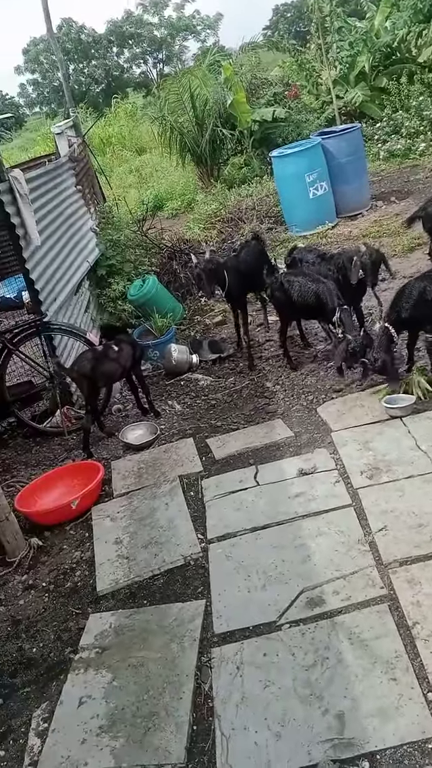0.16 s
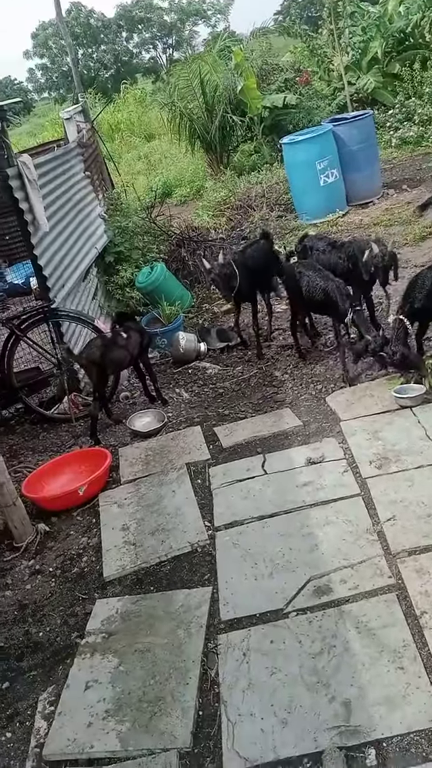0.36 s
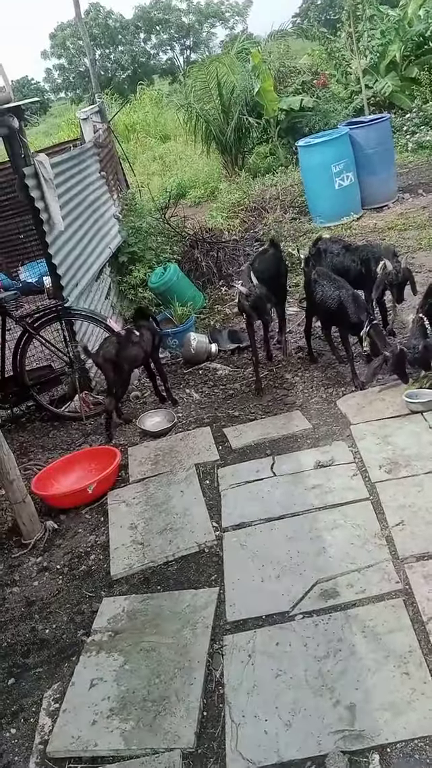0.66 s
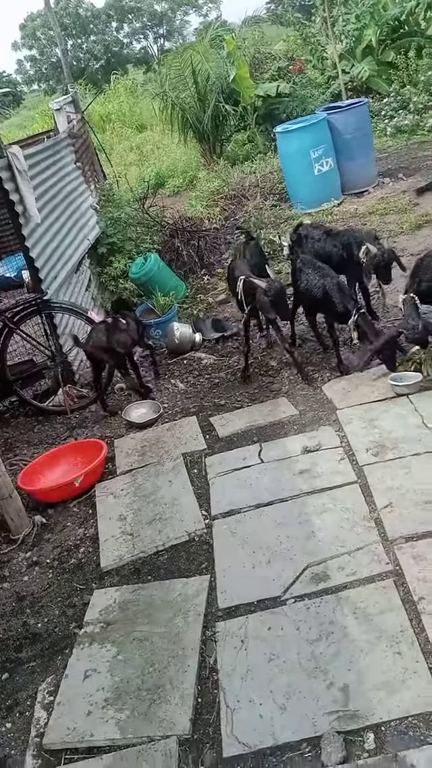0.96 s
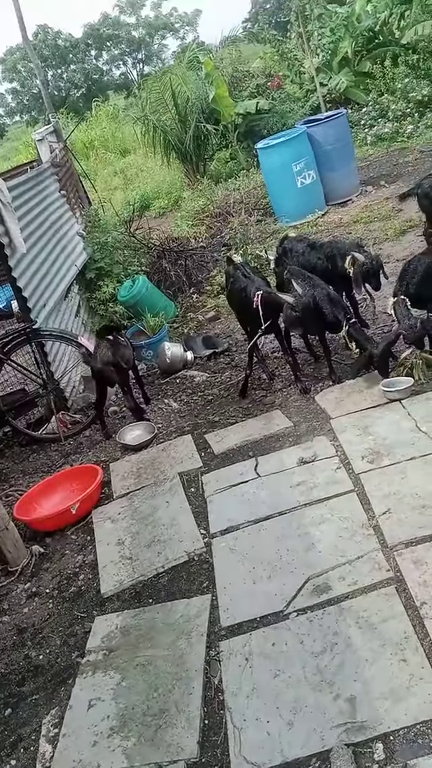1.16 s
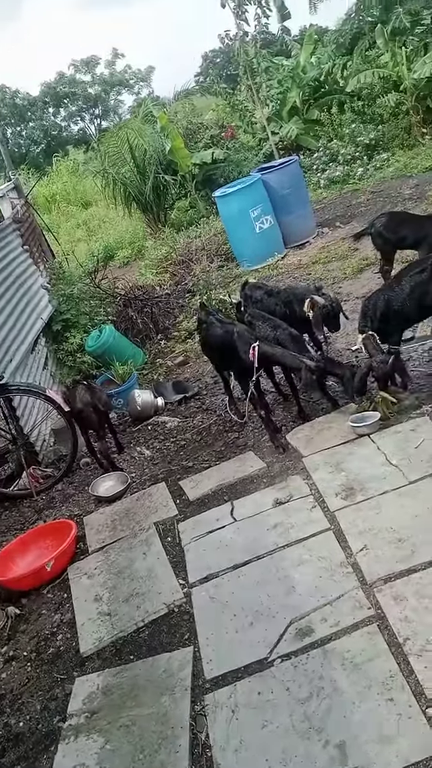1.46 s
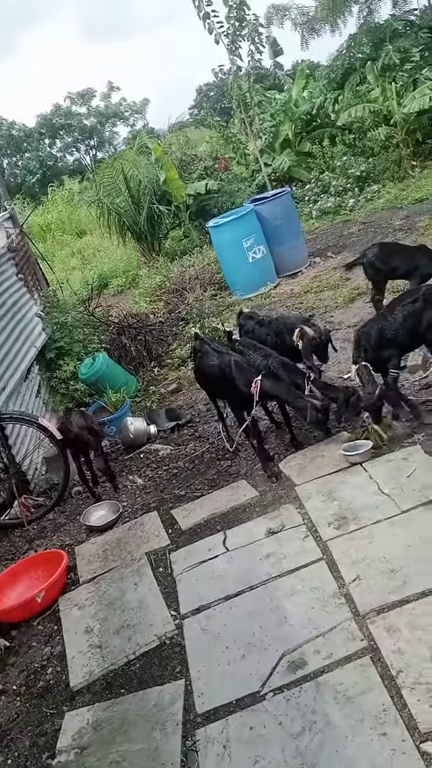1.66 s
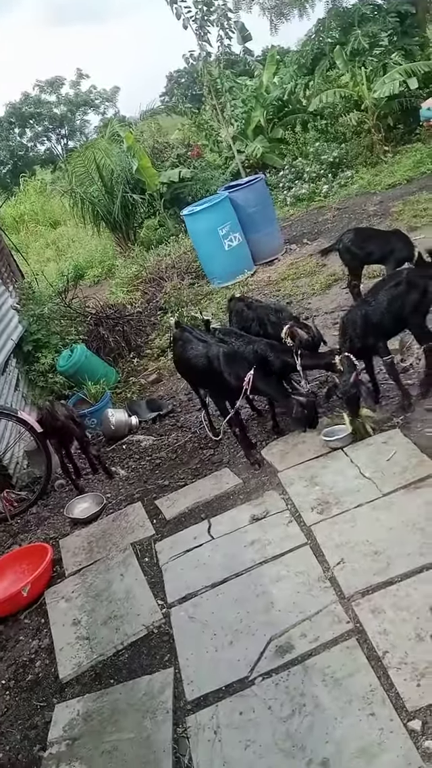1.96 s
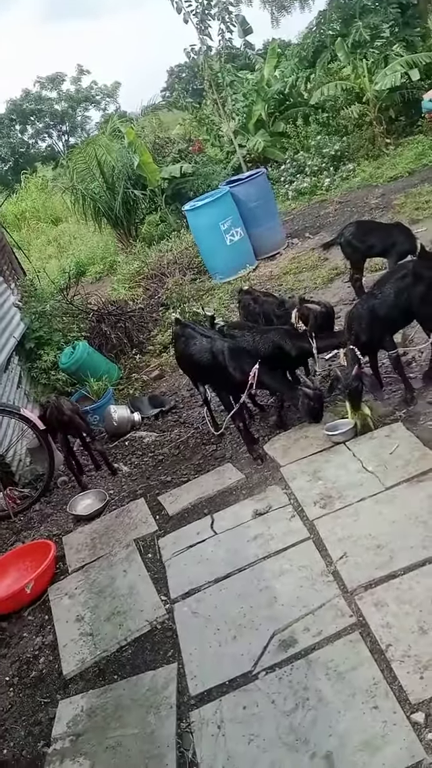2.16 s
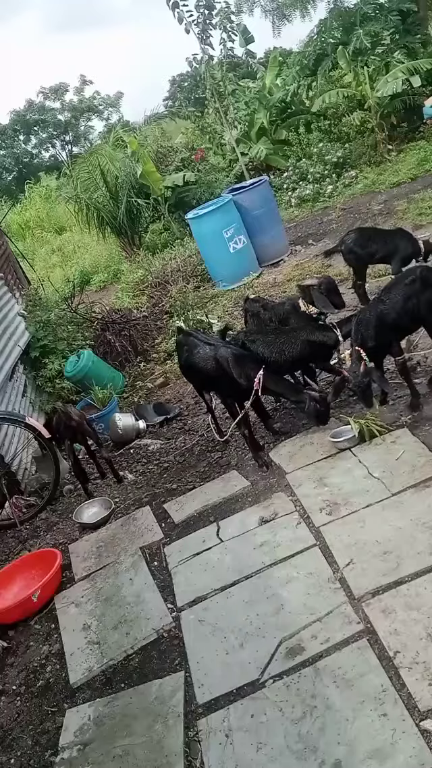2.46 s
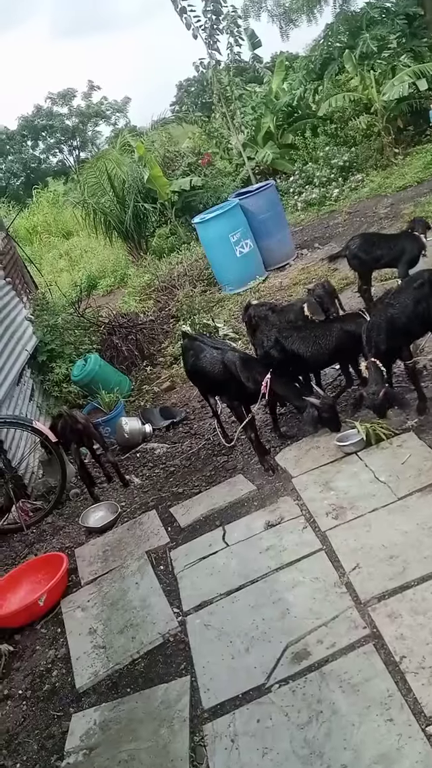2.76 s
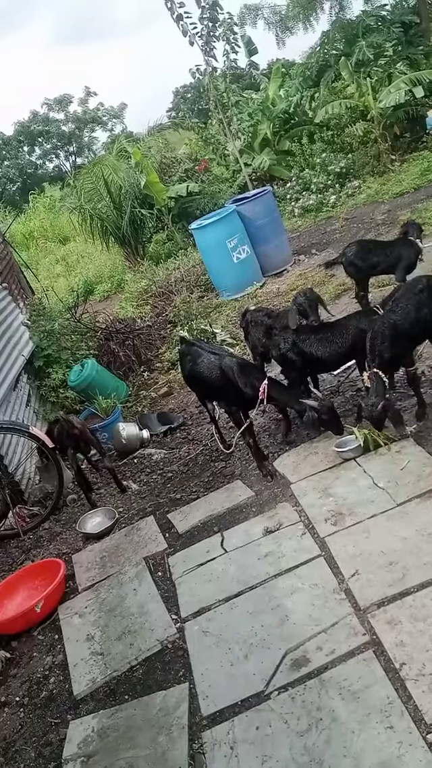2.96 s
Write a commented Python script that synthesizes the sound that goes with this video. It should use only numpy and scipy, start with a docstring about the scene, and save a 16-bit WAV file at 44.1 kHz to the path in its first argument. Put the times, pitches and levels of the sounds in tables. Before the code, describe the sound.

One loud clear goat bleat opens, roughening as it stops, then much quieter feeding around the microphone: crackling fodder, sharp snaps, light metallic clinks, thin bird whistles and a hoarse distant animal call outdoors.

```python
"""A farmyard with walls close by: a goat kid gives one high, clear bleat that breaks into a rasp and echoes.
Around one microphone the herd feeds: leaves rustle, stalks snap and a small metal piece clinks.
A bird whistles, an animal calls far off, and a low rumble swells and sinks throughout.
The voices are built from sines, the metal from ringing modes, the fodder and still air from shaped noise."""
import sys
import numpy as np
from scipy import signal
from scipy.fft import rfft, irfft
from scipy.io import wavfile
from scipy.ndimage import uniform_filter1d

SR = 44100
rng = np.random.default_rng(int(sys.argv[2]) if len(sys.argv) > 2 else 0)


def inscribe(sig):
    """Save sig as 16-bit PCM at rate SR to the path in sys.argv[1].

    A 1-D sig is mono; a 2-D sig holds one channel per row.
    Samples are clipped to [-1, 1] before scaling.
    """
    pcm = np.round(np.clip(np.atleast_2d(sig).T, -1, 1) * 32767)
    wavfile.write(sys.argv[1], SR, pcm.astype(np.int16))


N = 136710  # samples, 3.1 s


def undb(db):
    """Decibels to gain."""
    return 10 ** (np.asarray(db) / 20)


def unit(x):
    """Scale to rms 1."""
    return x / np.sqrt(np.mean(x ** 2) + 1e-20)


def curve(rows, lead=0):
    """Each column of a timed table, joined by straight lines; time starts at -lead seconds."""
    rows = np.array(rows, float)
    t = np.arange(N) / SR - lead
    return [np.interp(t, rows[:, 0], column) for column in rows.T[1:]]


def response(hz, points):
    """Gain of a (frequency, level) shape, read on a logarithmic frequency axis."""
    f, db = np.array(points, float).T
    return undb(np.interp(np.log(hz + 1), np.log(f), db))


def colour(x, points):
    """Causal minimum-phase filter with a (frequency, level) shape."""
    size = 8192
    cepstrum = irfft(np.log(response(np.arange(size // 2 + 1) * SR / size, points)))
    # fold the cepstrum forward in time, so that nothing sounds before its cause
    cepstrum[1:size // 2] *= 2
    cepstrum[size // 2 + 1:] = 0
    impulse = irfft(np.exp(rfft(cepstrum)))
    return signal.fftconvolve(x, impulse)[:len(x)]


def noise(points):
    """Coloured noise, rms 1."""
    return unit(colour(rng.standard_normal(N), points))


def walk(rate):
    """Smooth chance with spread 1, newly drawn `rate` times a second."""
    k = max(int(SR / rate), 1)
    steps = np.repeat(rng.standard_normal(N)[:N // k + 1], k)
    return unit(uniform_filter1d(steps, k)[:N])


def fade(start, t60):
    """Sudden onset and exponential decay by 60 dB in t60 seconds."""
    age = np.arange(N) / SR - start
    return (age >= 0) * np.exp(-np.log(1000) * np.maximum(age, 0) / t60)


def turn(hz):
    """Phase of a moving pitch."""
    return 2 * np.pi * np.cumsum(hz) / SR


def note(start, length):
    """Progress 0-1 through a note, and its rounded swell."""
    u = np.clip((np.arange(N) / SR - start) / length, 0, 1)
    return u, np.sqrt(4 * u * (1 - u))


# Colour of the diffuse echo: (frequency [Hz], level [dB])
ECHO_COLOUR = [(500, -1.5), (1200, -6), (3000, -0.5), (6500, -12.5)]
ECHO_T60_S, ECHO_DELAY_S = 0.38, .015


def tail(x, wet_db):
    """Diffuse echo from sheds and bushes: decaying noise, scaled to unit energy, smears the sound."""
    ring = noise(ECHO_COLOUR) * fade(ECHO_DELAY_S, ECHO_T60_S)
    return undb(wet_db) * signal.fftconvolve(x, ring / np.sqrt(np.sum(ring ** 2)))[:N]


# Single echoes from the nearby walls: (delay [s], level [dB])
NEARBY_WALLS = [(.0125, -4.5), (.0217, -14.5), (.058, -11)]


def yard(x):
    """Direct sound, then separate wall echoes and the diffuse tail."""
    out = x + tail(x, wet_db=-8.5)
    for delay, db in NEARBY_WALLS:
        out = out + undb(db) * np.pad(x, (int(delay * SR), 0))[:N]
    return out


# Pitch of the bleat: (time [s], pitch [Hz])
BLEAT_PITCH = [(0, 513), (.06, 526), (.082, 509), (.15, 531), (.176, 521), (.25, 518), (.32, 507),
               (.39, 480)]
# Effort of the bleat, levels relative to each other:
# (time [s], level of the low partials [dB], level of the treble [dB], roughness [0-1])
BLEAT_EFFORT = [(0, -42.5, -29.5, 0.26), (.05, -40.5, -38.5, 0.36), (.085, -38.5, -31.5, 0.39),
                (.22, -37.5, -31, 0.06), (.325, -41, -29.5, 0), (.372, -43, -37, .9),
                (.392, -46.5, -45.5, .9), (.46, -110, -100, 0.7)]
# Resonances of throat and mouth: (frequency [Hz], level [dB])
THROAT_SHAPE = [(510, -27.5), (1040, -13), (1560, 0), (2080, -15.5), (3120, -15), (3620, -2.5), (4150, -13),
                (4700, -7), (5750, -2), (6250, 3.5), (6750, 1), (7250, -10.5), (14000, -50.5)]
TREBLE_HZ = 3780  # partials that start above this follow the treble level
JITTER, RASP_JITTER = 0.00304, .07  # fractions of the pitch
SHIMMER_DB = 4  # independent wavering of each partial
FLUTTER_DB, FLUTTER_RATE = 1.9, 330  # shared flicker of the treble [dB, per s]
AIR_DB, RASP_DB, CHEST_DB = 4, -2.5, -24  # against the treble, before roughness weights them
# A bright mouth resonance climbs through the bleat
MOUTH_FROM_HZ, MOUTH_RISE_HZ_PER_S, MOUTH_WIDTH_HZ, MOUTH_DB = 4920, 4780, 560, 4
LEAD_S = .15  # the voice runs this long before time 0, so its echoes already sound


def smooth_walk(rate):
    """A chance walk rounded further, for slow changes in the voice."""
    return unit(uniform_filter1d(walk(rate), size=300))


def goat():
    """The bleat is already under way: folds drive the throat, air hisses with them; as effort ends they rasp."""
    pitch, = curve(BLEAT_PITCH, LEAD_S)
    low_db, high_db, rough = curve(BLEAT_EFFORT, LEAD_S)
    since_start = np.clip(np.arange(N) / SR - LEAD_S, 0, BLEAT_PITCH[-1][0])
    mouth_hz = MOUTH_FROM_HZ + MOUTH_RISE_HZ_PER_S * since_start

    wobble = JITTER * smooth_walk(109.65) + RASP_JITTER * rough ** 2 * np.abs(rough) * walk(600)
    phase = turn(pitch * (1 + wobble))
    flutter = undb(FLUTTER_DB * walk(FLUTTER_RATE))
    low, high = np.zeros(N), np.zeros(N)
    for k in range(1, 27):
        mouth = MOUTH_DB * np.exp(-((k * pitch - mouth_hz) / MOUTH_WIDTH_HZ) ** 2)
        gain = response(k * pitch, THROAT_SHAPE) * undb(SHIMMER_DB * smooth_walk(79.74) + mouth)
        partial = gain * np.cos(k * phase + rng.uniform(0, 2 * np.pi))
        if k * BLEAT_PITCH[0][1] < TREBLE_HZ:
            low += partial
        else:
            high += partial * flutter

    # breath is let through once per cycle of the folds
    puffs = noise(THROAT_SHAPE) * (1 + np.cos(phase))
    above = signal.butter(8, TREBLE_HZ, "high", fs=SR, output="sos")
    air = unit(signal.sosfilt(above, puffs))
    chest_band = signal.butter(2, [300, 520], "band", fs=SR, output="sos")
    chest = unit(signal.sosfilt(chest_band, rng.standard_normal(N)))
    rasp = undb(RASP_DB) * np.clip(2 * rough - 1, 0, 1) * noise(THROAT_SHAPE)
    rasp = rasp + undb(CHEST_DB) * rough ** 2 * chest

    treble = (unit(high) + undb(AIR_DB) * rough * air + rasp) / np.sqrt(1 + rough ** 2)
    voice = undb(low_db) * unit(low) + undb(high_db) * treble
    lead = int(LEAD_S * SR)
    voice = voice * np.minimum(np.arange(N) / lead, 1)
    return np.pad(yard(voice * undb(-1.5))[lead:], (0, lead))


# Leaves stirred by the feeding herd, levels relative: (time [s], level [dB])
LEAF_LEVEL = [(.55, -69.5), (.77, -67), (.865, -72.5), (.92, -66.5), (1.06, -72), (1.12, -66), (1.28, -68),
              (1.43, -77.5), (1.64, -66), (1.72, -70), (1.88, -64), (1.955, -56), (2.05, -67), (2.14, -64),
              (2.35, -64.5), (2.48, -71.5), (2.53, -64), (2.77, -73.5), (2.94, -65.5), (3.06, -74.5)]
# Colour of the leaves: (frequency [Hz], level [dB])
LEAF_COLOUR = [(300, -13.5), (2700, -12.5), (3600, -4), (6500, 3), (7600, -2.5), (9500, -18),
               (14000, -29.5)]
RUSTLE_DB = 1  # raises the whole rustle
GRAIN_RATE, GRAIN_SPREAD_DB = 4300, 4  # crackles per second, and their uneven strength
LEAF_T60_S = 0.019
LEAF_PATCH_DB, LEAF_PATCH_RATE, LEAF_BAND_HZ = 2.3, 24, 1100


def patchy(x):
    """Each band swells and sinks on its own, as different leaves are moved."""
    spectrum = rfft(x)
    band = np.arange(N // 2 + 1) * SR / N / LEAF_BAND_HZ
    out = np.zeros(N)
    for k in range(16):
        one_band = irfft(spectrum * np.maximum(1 - np.abs(band - k), 0), N)
        out += one_band * undb(LEAF_PATCH_DB * walk(LEAF_PATCH_RATE))
    return unit(out)


def rustle():
    """Handfuls of leaves brush and crackle unevenly: random short grains set the strength of noise."""
    strength = undb(GRAIN_SPREAD_DB * np.minimum(rng.exponential(size=N), 5))
    grains = (rng.random(N) < GRAIN_RATE / SR) * strength
    power = signal.fftconvolve(grains ** 2, fade(0, LEAF_T60_S) ** 2)[:N]
    brushing = np.sqrt(np.abs(power))
    leaves = unit(colour(brushing * rng.standard_normal(N), LEAF_COLOUR))
    return patchy(leaves) * undb(curve(LEAF_LEVEL)[0] + RUSTLE_DB)


# Snapping stalks and hoof ticks:
# (time [s], level [dB], level of the woody body against the crack [dB], decay by 60 dB [s])
STALK_SNAPS = [(0.7382, -69.5, -5, 0.048), (0.882, -59.5, -23, 0.078), (0.9863, -62.5, -3.5, 0.054),
               (1.102, -56.5, -5, 0.045), (1.464, -52, -27, 0.014), (1.614, -52.5, -13.5, 0.07),
               (1.66, -64.5, 2.5, 0.078), (1.76, -68, 8, 0.058), (1.781, -60.5, 0, 0.14),
               (1.819, -60.5, 3, 0.021), (2.5678, -46, -13, 0.029)]
# Colour of the crack: (frequency [Hz], level [dB])
CRACK_COLOUR = [(1500, -38), (4000, -18.5), (6800, 6), (13000, -33.5)]
# Colour of the woody body: (frequency [Hz], level [dB])
BODY_COLOUR = [(900, -4.5), (2700, 12), (6000, -12)]


def snaps():
    """Stalks snap and hooves tick: short noise bursts, a bright crack over a woody body."""
    out = np.zeros(N)
    crack, body = noise(CRACK_COLOUR), noise(BODY_COLOUR)
    for start, db, body_db, t60 in STALK_SNAPS:
        burst = uniform_filter1d(fade(start, t60), size=60)  # softens the onset
        out += undb(db) * burst * (crack + undb(body_db) * body)
    return out


def feeding():
    """Rustle and snaps share one faint diffuse echo."""
    out = rustle() + snaps()
    return out + tail(out, wet_db=-12)


# Knocks on the metal: (time [s], level [dB], hardness, as level of the contact tick [dB])
METAL_KNOCKS = [(2.0807, -56, -19), (2.1401, -41.5, -24), (2.1536, -46.5, -22), (2.226, -51, -13),
                (2.2358, -58, -25), (2.2785, -54.5, -16), (2.608, -46.5, -36), (2.691, -51.5, -35),
                (2.805, -52.5, -4.5), (2.822, -57, -29), (2.9615, -52.5, 11.5)]
# Modes of the metal: (frequency [Hz], level [dB], decay by 60 dB at hardness 0 dB [s])
METAL_MODES = [(2160, -17, 0.12), (2973, -5, 0.29), (3010, -2.5, 0.3), (3076, -0.5, 0.24),
               (3310, -12, 0.12), (7500, -18, 0.23), (10600, -27, 0.13)]
# Colour of the contact tick: (frequency [Hz], level [dB])
TICK_COLOUR = [(1200, -32), (3100, 4), (4300, -15), (7500, -3), (11000, -27)]
TICK_T60_S, METAL_DETUNE = .03, .004  # detune: spread as a fraction of each mode
METAL_SWING, METAL_SWING_RATE = .007, 130  # pitch wander [fraction, per s]
# A hard knock leaves the piece free to ring longer (dB of ring time per dB of hardness)
RING_BUILD_S, RING_PER_HARDNESS = 0.0041, 0.33


def clinks():
    """A small swinging metal piece is knocked: a tick, then modes that beat, bend and shiver."""
    t, out = np.arange(N) / SR, np.zeros(N)
    tick = noise(TICK_COLOUR)
    shiver = undb(2 * walk(250))
    swing = turn(1 + METAL_SWING * walk(METAL_SWING_RATE))  # phase of a 1 Hz mode
    for start, db, hard_db in METAL_KNOCKS:
        out += undb(db + hard_db) * tick * fade(start, TICK_T60_S)
        build = np.clip((t - start) / RING_BUILD_S, 0, 1) * shiver
        longer = undb(RING_PER_HARDNESS * hard_db)
        phase = swing - swing[int(start * SR)]
        for (hz, mode_db, t60), off in zip(METAL_MODES, rng.standard_normal(len(METAL_MODES))):
            ring = np.sin(hz * (1 + METAL_DETUNE * off) * phase)
            out += undb(db + mode_db) * build * fade(start, t60 * longer) * ring
    return out + tail(out, wet_db=-18.5)


# Arched whistles: (time [s], length [s], top of the arch [Hz], level [dB])
BIRD_WHISTLES = [(.571, .11, 5430, -68), (.96, .15, 5460, -65), (1.75, .22, 5230, -63.5),
                 (2.35, .165, 5340, -64.5), (2.75, .195, 5345, -64)]
# Falling chips: (time [s], starting pitch [Hz], level [dB])
BIRD_CHIPS = [(.705, 3850, -61.5), (1.112, 4150, -59.5), (1.276, 3330, -62)]
WHISTLE_SAG_HZ, CHIP_S, CHIP_TO_HZ = 358, .028, 3020


def bird():
    """Thin wavering whistles and quick falling chips, single sines scattered by the bushes."""
    out = np.zeros(N)
    quiver_hz, flutter = 50 * walk(400), undb(3 * walk(70))
    for start, length, top_hz, db in BIRD_WHISTLES:
        u, swell = note(start, length)
        arch = top_hz - WHISTLE_SAG_HZ * (2 * u - .9) ** 4
        out += undb(db) * swell * flutter * np.sin(turn(arch + quiver_hz))
    for start, hz, db in BIRD_CHIPS:
        u, swell = note(start, CHIP_S)
        fall = hz + (CHIP_TO_HZ - hz) * u
        out += undb(db) * swell * flutter * np.sin(turn(fall + quiver_hz))
    return out + tail(out, wet_db=-8)


# Calls far off: (time [s], length [s], starting pitch [Hz], mouth resonance [Hz], level [dB])
DISTANT_CALLS = [(0.99, 0.058, 441.5, 618, -75.5), (1.507, .11, 505.4, 1000, -58),
                 (1.582, 0.08, 421, 513, -72.5), (1.776, 0.046, 480, 480, -71), (2.082, .07, 317, 930, -75),
                 (2.212, 0.0663, 310, 760, -64.5)]
FAR_FALL, FAR_JITTER = .14, .04  # fractions of the pitch
FAR_MOUTH_OCT = .42  # width of the mouth resonance [octaves]


def far_animal():
    """Short, hoarse calls that lift and then fall: six partials through one mouth resonance, with much echo."""
    out = np.zeros(N)
    for start, length, hz, mouth_hz, db in DISTANT_CALLS:
        u, swell = note(start, length)
        bend = FAR_FALL * (u - 1.687 * u ** 2)
        phase = turn(hz * (1 + bend + FAR_JITTER * walk(300)))
        call = np.zeros(N)
        for k in range(1, 7):
            octaves_off = np.log2(k * hz / mouth_hz)
            call += np.sin(k * phase) / (1 + (2 * octaves_off / FAR_MOUTH_OCT) ** 2)
        out += undb(db) * swell * unit(call)
    return out + tail(out, wet_db=-4)


# Swelling of the low rumble: (time [s], level [dB])
RUMBLE_LEVEL = [(0, -65), (.08, -46.5), (.23, -51.5), (.28, -62), (.43, -53.5), (.71, -70), (.76, -51),
                (1.13, -76), (1.23, -50), (1.42, -58.5), (1.55, -48), (1.75, -61), (1.92, -50),
                (2.29, -62.5), (2.41, -45), (2.58, -58), (2.72, -51), (3.0, -71), (3.05, -55.5)]
# Colour of the duller noise: (frequency [Hz], level [dB])
RUMBLE_SHAPE = [(40, -34), (60, -6), (88, 2.5), (180, -17.5), (300, -54)]
RUMBLE_HZ, RUMBLE_WANDER = 92, .07  # wander as a fraction of the pitch
THROB_DB, RUMBLE_NOISE_DB = -.5, -8  # against the rumble level


def rumble():
    """A narrow low tone wanders in pitch and strength inside duller noise."""
    pitch = RUMBLE_HZ * (1 + RUMBLE_WANDER * walk(35))
    throb = unit(np.sin(turn(pitch)) * undb(2 * walk(25)))
    mix = undb(THROB_DB) * throb + undb(RUMBLE_NOISE_DB) * noise(RUMBLE_SHAPE)
    return undb(curve(RUMBLE_LEVEL)[0]) * mix


# Colour of the still air: (frequency [Hz], level [dB])
AIR_COLOUR = [(25, -4), (90, 7), (1200, -19), (6500, -29.5), (11000, -47), (15000, -31.5)]


def still_air():
    """The steady, faint hush behind everything: coloured noise."""
    return undb(-75.5) * noise(AIR_COLOUR)


def scene():
    """All sources at one microphone."""
    near = goat() + feeding() + clinks()
    around = bird() + far_animal() + rumble() + still_air()
    return (near + around)[None]


def record(dry):
    """The recorder cuts the top, above 15.5 kHz."""
    return signal.sosfilt(signal.ellip(8, .2, 70, 15500, fs=SR, output="sos"), dry)


dry = scene()
out = record(dry)
inscribe(out)
```